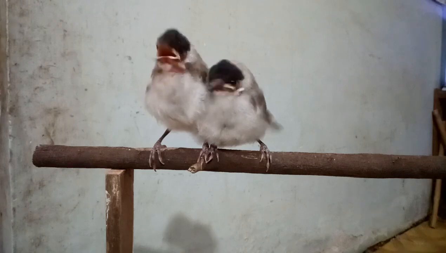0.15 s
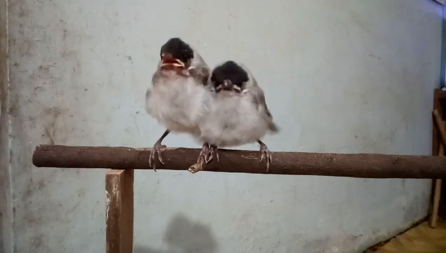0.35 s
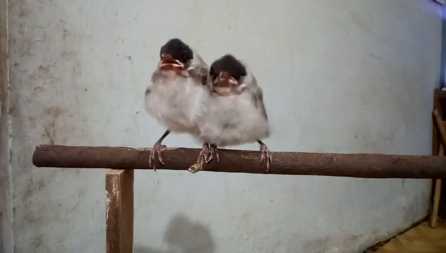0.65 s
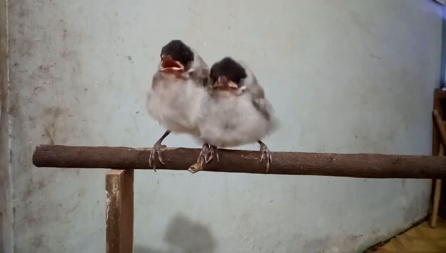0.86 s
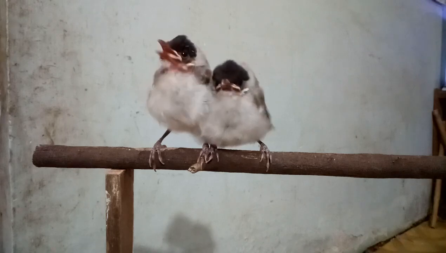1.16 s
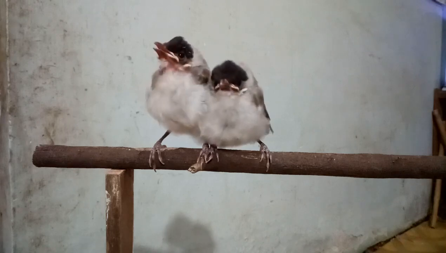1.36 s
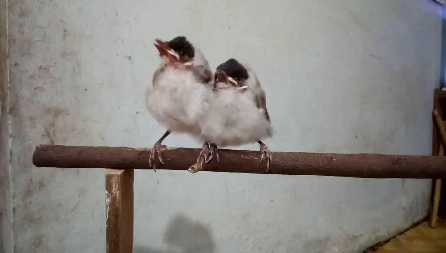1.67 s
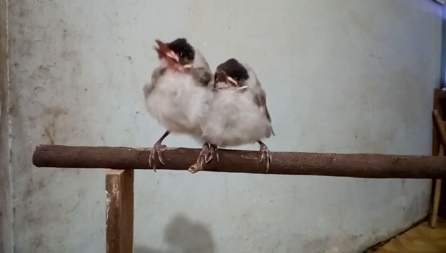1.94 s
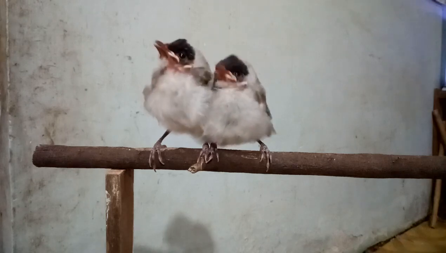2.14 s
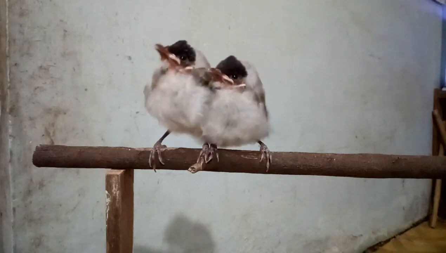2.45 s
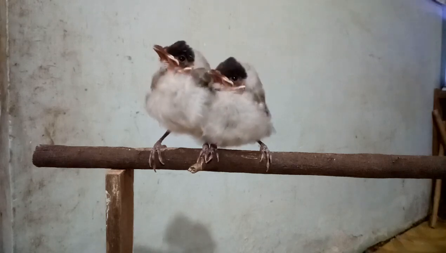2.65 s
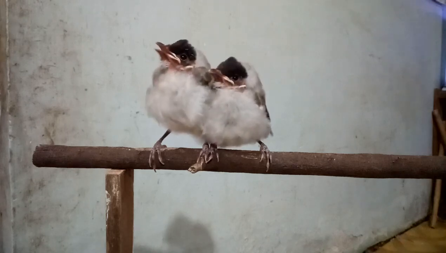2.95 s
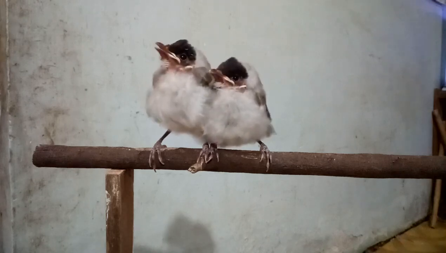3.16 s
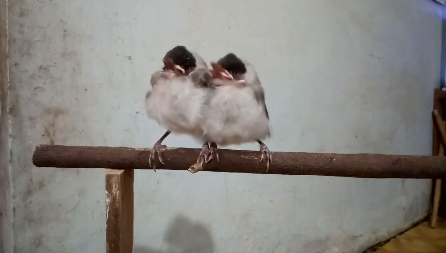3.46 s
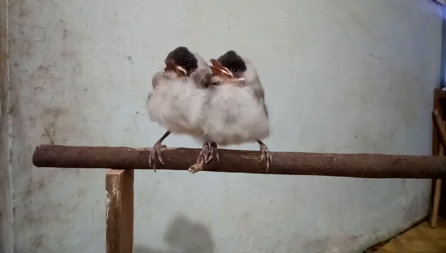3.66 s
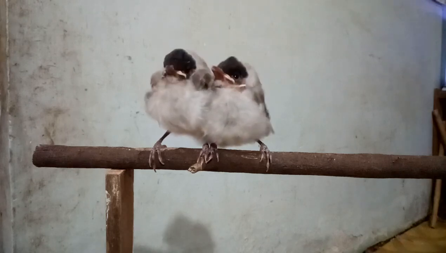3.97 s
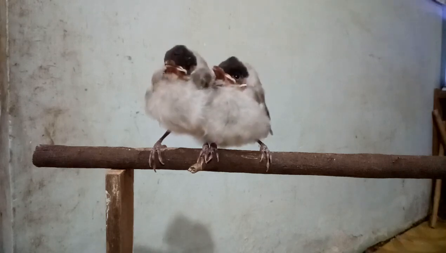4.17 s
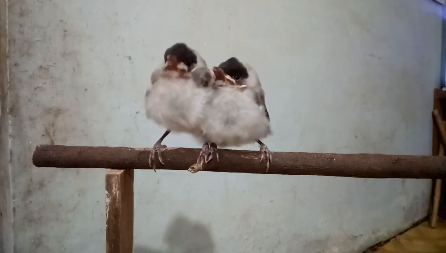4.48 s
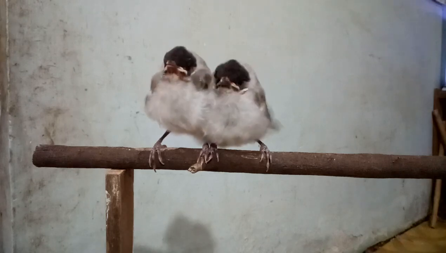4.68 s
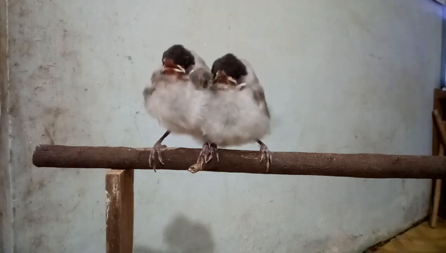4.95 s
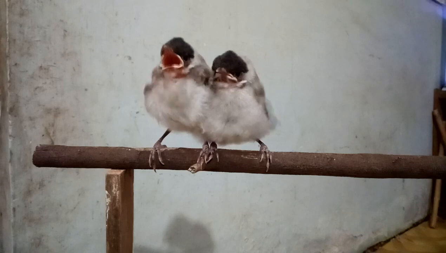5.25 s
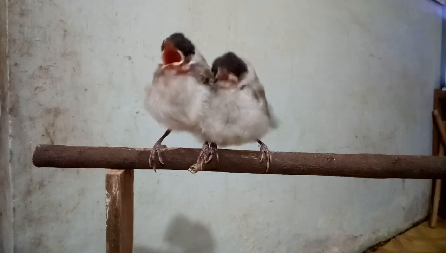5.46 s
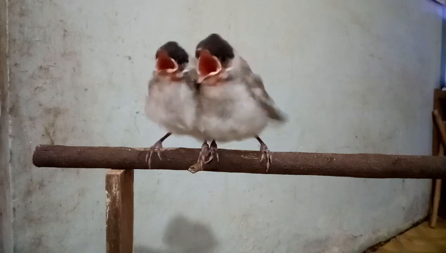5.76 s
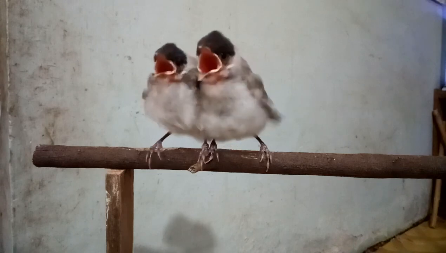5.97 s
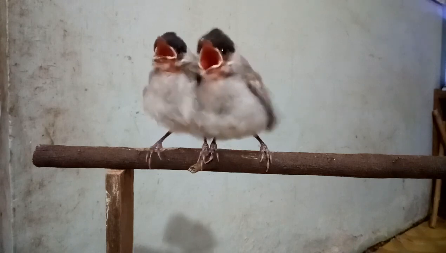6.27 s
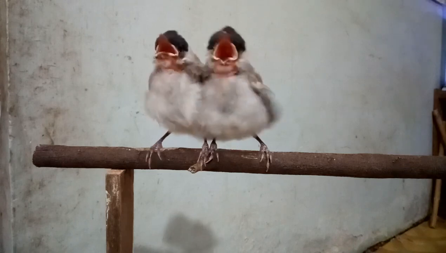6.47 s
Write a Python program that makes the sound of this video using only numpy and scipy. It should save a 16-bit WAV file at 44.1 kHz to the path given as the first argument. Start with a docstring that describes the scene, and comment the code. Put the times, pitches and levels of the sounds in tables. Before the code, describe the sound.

Fledglings chirp rapidly close by indoors, their high calls often trilling, with a soft low hum behind them.

```python
"""A small, hard-walled room: two fledglings beg close by on a wooden perch.
Each chirp is a shrill syrinx whistle that opens with a rasp or a downward scoop and often breaks
into a fast trill. The walls ring after every call. The perch knocks once.
Behind them an electric motor hums and buzzes faintly over a soft rush of air."""
import sys
import numpy as np
from scipy import signal
from scipy.fft import rfft, irfft
from scipy.io import wavfile

SR = 44100
rng = np.random.default_rng(int(sys.argv[2]) if len(sys.argv) > 2 else 0)


def wav_record(signal):
    """Record a signal, one row per channel, as 16-bit PCM in the file named by sys.argv[1]."""
    frames = np.transpose(np.atleast_2d(signal))
    bounded = np.clip(frames, -1, 1)
    # unit amplitude maps onto the largest positive 16-bit level
    quanta = np.round(bounded * 32767).astype(np.int16)
    wavfile.write(sys.argv[1], SR, quanta)


N = 291942
TIME = np.arange(N) / SR
ATTACK_S, RELEASE_S = .007, 0.0098  # half the length of each call's fade in and fade out

# Trilled calls. Each row: start and length in seconds, nominal pitch in Hz, glide as a share of pitch,
# trill rate in Hz, nominal swing in Hz, trill build time and opening rasp in seconds,
# relative levels of call, octave and in-between tones in dB.
TRILL_CALLS = [(0.088, .072, 2894, 0.056, 77.8, 420, .065, 0.025, -28, -8, -13),
               (0.896, .096, 3636, .16, 94.1, 425.4, 0.063, 0.024, -23.5, -9, -19),
               (1.085, .084, 3168, .04, 101, 324, .06, .02, -22, -9.5, -20.5),
               (1.31, 0.072, 2916, -.04, 69.7, 234, 0.053, .014, -27, -9.5, -16),
               (2.507, 0.059, 3427, 0.065, 98, 470, .025, 0.0033, -23, -11.5, -30),
               (2.718, .049, 3027, 0.021, 91.9, 336.5, .035, 0.0025, -21, -15.5, -24),
               (3.283, 0.061, 3168, .06, 100.2, 333, 0.052, .013, -23, -15.5, -22),
               (3.819, 0.06, 3506, -.06, 105.3, 328.5, 0.0069, 0.0027, -23, -10, -26),
               (3.996, 0.053, 3195, -.01, 98.9, 332, .005, .004, -22.5, -14, -56),
               (5.225, .076, 3577, 0.094, 106.5, 343, 0.0039, .011, -22, -7.5, -18.5),
               (5.403, 0.099, 3226, -0.047, 99.1, 316, .005, 0.0033, -26, -8, -14),
               (5.609, .08, 3134, -.06, 75.1, 387, 0.06, .016, -27, -2, -10),
               (5.795, .08, 3238, -.05, 110.2, 311.4, 0.0041, 0.028, -27.5, -3.5, -12.5),
               (6.161, 0.041, 4307, -0.079, 81, 260, .04, 0.0072, -26.5, -28, -21.5),
               (6.284, 0.045, 4234, 0.072, 90.55, 375, 0.0028, .009, -28.5, -22, -16),
               (6.349, .055, 3764, 0.16, 91.4, 327, 0.055, 0.018, -23.5, -20.5, -26.5),
               (6.435, 0.054, 3252, -0.0096, 98.2, 353, 0.0042, 0.011, -26.5, -4.5, -10.5),
               (6.471, 0.061, 3763, .12, 93.5, 482, 0.0058, 0.015, -27.5, -26, -13.5)]
# Clear calls. Each row: start and length in seconds, nominal pitch in Hz, glide as a share of pitch,
# opening rasp in seconds, relative levels of call and octave in dB.
WHISTLE_CALLS = [(0.806, 0.049, 3690, .02, .003, -22, -12.5), (1.873, 0.064, 3330, .22, 0.024, -22, -24),
                 (2.338, 0.052, 3862, .06, 0.0027, -22, -17.5),
                 (3.089, 0.068, 3394, .05, 0.022, -25.5, -14.5),
                 (3.656, .051, 3773, -.1, 0.0042, -21.5, -18), (4.254, 0.075, 3320, .115, 0.02, -24, -24),
                 (5.055, 0.048, 3750, .02, 0.0036, -22.5, -13.5)]
# Swooping calls. Each row: start and length in seconds, opening, low and upper pitch in Hz,
# glide as a share of pitch, nominal closing swing in Hz, relative levels of call, low note, octave in dB.
SWOOP_CALLS = [(.274, .082, 4240, 2555, 2908, -.06, 34, -29, -1, -4.5),
               (2.001, 0.068, 3800, 2710, 3398, 0.02, 600, -25, -6, -18),
               (2.186, .087, 3990, 2568, 2930, -0.11, 92, -25.5, -1.5, -9.5),
               (2.444, 0.073, 4160, 2510, 2805, -.06, 20, -23.5, -4, -21.5),
               (3.476, .072, 4114, 2566, 2941, -0.1, 23, -24, -3.5, -14.5),
               (4.451, .076, 3574, 2743, 3012, -0.017, 240, -23, -5.5, -15.5),
               (4.645, 0.068, 3860, 2512, 3002, 0.072, 427, -22, -8, -20)]
# Filter of throat and open beak. Each row: frequency in Hz, gain in dB.
BEAK_GAIN = [(1100, -15.5), (1500, -4.5), (2300, -2.5), (2700, -2.5), (3400, 2), (4150, 6), (5050, -6),
             (5700, 5), (7000, -0.5), (8300, -15), (10000, 3), (12500, -14.5), (15500, -25)]
# Turbulence in the open throat. Each row: frequency in Hz, relative level in dB.
THROAT_HISS = [(1200, -22), (2200, -9.5), (2750, -5.5), (4300, 7.5), (5000, -3.5), (5800, -17),
               (7200, -15.5), (8500, -21), (14000, -53)]
# Sound thrown sideways by the beak and returned by the walls. Each row: frequency in Hz, gain in dB.
WALL_GAIN = [(1500, 1), (2600, 1.5), (3200, -2), (3800, 4.5), (4400, 1), (5100, -1), (6000, -2.5),
             (9000, 0.5), (14000, -4.5)]
# Room decay. Each row: frequency in Hz, time to fall 60 dB in seconds.
ROOM_T60 = [(1500, 0.23), (3000, 0.26), (5000, 0.27), (8000, 0.22), (14000, 0.21)]
# Motor hum. Each row: frequency in Hz, level in dB.
MOTOR_TONES = [(99.95, -38), (199.9, -50.5), (240.2, -65), (441, -69.5)]
# Lulls as the motor's loose part settles. Each row: centre and half width in seconds, depth in dB.
BUZZ_LULLS = [(2.778, 0.58, -19), (6.6, 0.4, -26)]
# Room air. Each row: frequency in Hz, relative spectral density in dB.
AIR_SPECTRUM = [(25, -9.5), (60, -7.5), (110, 6), (180, 3), (300, -8), (480, -12), (700, -25), (1100, -36),
                (2500, -41), (6000, -52.5), (15000, -54.5)]


def fledglings(gain_db=-1.0):
    """All calls of both birds, filtered by throat and beak."""
    jitter, shimmer, waver = wander(hz=1000), wander(hz=268), wander(hz=125)
    noises = np.array([jitter, shimmer, waver, unit(shaped_noise(THROAT_HISS))])
    return undb(gain_db) * colour(whistles(noises) + swoops(noises) + trills(noises), BEAK_GAIN)


def syrinx(start_s, length_s, pitch_hz, swing_hz, trill_hz, rasp_s, db, octave_db, between_db, noises,
           sag=0.088, bloom_s=0.0068, last_crest_s=.008, wide_swing_hz=500, alternation=.25, cusp=0.22,
           rasp_tone_db=-4, rasp_hiss_db=-3, trill_hiss_db=-19, opening_db=-8, crest_db=2.0):
    """One call as (onset, samples): membranes flap irregularly, then lock into a trilling tone."""
    t = call_clock(length_s)
    jitter, shimmer, waver, hiss = noises.take(int(start_s * SR) + np.arange(len(t)), axis=1, mode="wrap")
    opening = np.clip((t + ATTACK_S) / (2 * ATTACK_S), 0, 1)
    closing = np.clip((t - length_s + RELEASE_S) / (2 * RELEASE_S), 0, 1)
    pitch_hz = pitch_hz * (1 - sag * closing ** 2) * (1 + .01 * waver)  # sags as pressure is let go
    # uneven turns with pointed crests, alternately wide and narrow
    swing_hz = swing_hz * np.exp(.15 * waver)
    turn = 2 * np.pi * trill_hz * (t - length_s + last_crest_s) + .35 * waver
    offset_hz = swing_hz * (1 + alternation * np.cos(turn / 2)) * (np.cos(turn) + cusp * np.cos(2 * turn))
    hz = pitch_hz + offset_hz
    # unsteady before the lock, and slightly so in a wide trill
    rasp_depth = min(rasp_s / bloom_s, 1)
    rasp = rasp_depth * np.exp(-(t / rasp_s) ** 4)
    strain = swing_hz / wide_swing_hz
    unrest = .005 + .015 * strain + 0.12 * rasp
    phase = 2 * np.pi * np.cumsum(hz * (1 + unrest * jitter)) / SR
    # Each pair: multiple of the pitch, level in dB. Unequal alternate cycles give the half multiples.
    partials = [(2, octave_db), (.5, -24 + between_db / 5)]
    partials += [(3 + k, -13 + 1.35 * octave_db - 0.5 * k) for k in range(3)]
    partials += [(1.5 + k, between_db - 10 * np.sqrt(2 * k)) for k in range(4)]
    bloom = np.clip((t + ATTACK_S) / (bloom_s + rasp_s), 0, 1) * (1 - closing)  # partials need pressure
    tone = np.sin(phase)
    for k, partial_db in partials:
        tone += undb(partial_db) * bloom ** abs(k - 1) * np.sin(k * phase) * (k * hz < SR / 2)
    # unsteady vibration turns part of the air to hiss
    breath = hiss * np.sqrt(bloom) * (undb(rasp_hiss_db) * rasp + undb(trill_hiss_db) * strain)
    voice = np.sqrt(2) * tone * undb(rasp_tone_db * rasp) + breath
    # soft until locked, fullest past the middle, loudest on the crests
    unlocked = rasp_depth * np.exp(-(np.maximum(t, 0) / (1.085 * rasp_s)) ** 4)
    arch_db = -5 * (t / length_s - 0.55) ** 2
    level_db = db + opening_db * unlocked + arch_db + crest_db * offset_hz / wide_swing_hz
    gate = (np.sin(np.pi / 2 * opening) * np.cos(np.pi / 2 * closing)) ** 2
    return start_s - ATTACK_S, voice * gate * undb(level_db) * np.exp(.18 * shimmer)


def trills(noises, drop=0.068, lead_db=-20):
    """Harsh calls whose pitch shakes wider and wider up to full swing."""
    out = np.zeros(N)
    for (start_s, length_s, hz, share, trill_hz, full_swing_hz, build_s, rasp_s,
         db, octave_db, between_db) in TRILL_CALLS:
        t = call_clock(length_s)
        pitch_hz = hz * glide(t, length_s, share) * scoop(t, drop)
        swing_hz = full_swing_hz * np.clip(t / build_s, 0, 1) ** 2
        add(out, *syrinx(start_s, length_s, pitch_hz, swing_hz, trill_hz, rasp_s,
                         db, octave_db, between_db, noises))
        add(out, *lead_in(start_s, hz, db + lead_db))
    return out


def whistles(noises, drop=0.14, waver_hz=49, end_swing_hz=70, lead_db=-22):
    """Clear calls with a small scoop and a waver that grows towards the end."""
    out = np.zeros(N)
    for start_s, length_s, hz, share, rasp_s, db, octave_db in WHISTLE_CALLS:
        t = call_clock(length_s)
        pitch_hz = hz * glide(t, length_s, share) * scoop(t, drop)
        swing_hz = end_swing_hz * np.clip(t / length_s, 0, 1)
        between_db = -15 + 0.71 * octave_db
        add(out, *syrinx(start_s, length_s, pitch_hz, swing_hz, waver_hz, rasp_s,
                         db, octave_db, between_db, noises))
        add(out, *lead_in(start_s, hz, db + lead_db, ahead_s=.014))
    return out


def swoops(noises, dive_s=.0085, step_s=.029, step_width_s=.004, trill_hz=77, rasp_s=0.0035,
           hoarse_db=4, lead_db=-8):
    """Calls that dive to a soft, hoarse low note, step up and may end in a trill."""
    out = np.zeros(N)
    for start_s, length_s, from_hz, low_hz, hz, share, end_swing_hz, db, low_db, octave_db in SWOOP_CALLS:
        t = call_clock(length_s)
        low = (1 - np.tanh((t - step_s) / step_width_s)) / 2
        after_step = np.clip((t - step_s) / (length_s - step_s), 0, 1)
        dive_hz = low_hz * scoop(t, from_hz / low_hz - 1, dive_s)
        pitch_hz = low * dive_hz + (1 - low) * hz * (1 + share * after_step)
        swing_hz = end_swing_hz * after_step ** 0.64
        between_db = -10 + 0.85 * octave_db + hoarse_db * low
        add(out, *syrinx(start_s, length_s, pitch_hz, swing_hz, trill_hz, rasp_s,
                         db + low_db * low, octave_db, between_db, noises))
        add(out, *lead_in(start_s, hz, db + low_db + lead_db))
    return out


def lead_in(start_s, pitch_hz, db, ahead_s=0.01, length_s=.016, from_ratio=1.56, to_ratio=1.3):
    """A thin, scratchy whistle slides down towards the note as the syrinx opens."""
    along = np.linspace(0, 1, int(length_s * SR))
    scratch = 0.19 * rng.standard_normal(SR // 10)[:len(along)]
    hz = pitch_hz * (from_ratio + (to_ratio - from_ratio) * along) * (1 + scratch)
    envelope = undb(db) * np.sin(np.pi * along ** 0.91) ** 2
    return start_s - ahead_s, envelope * np.sqrt(2) * np.sin(2 * np.pi * np.cumsum(hz) / SR)


def call_clock(length_s):
    """Seconds from the start of a call, padded for attack and release."""
    return np.arange(-ATTACK_S, length_s + RELEASE_S, 1 / SR)


def glide(t, length_s, share):
    """Pitch factor: a linear slide through the body of a call."""
    return 1 + share * (np.clip(t / length_s, .2, .9) - .55) / .7


def scoop(t, share, scoop_s=.0088):
    """Pitch factor: a drop into the note from a share above it."""
    return 1 + share * np.exp(-(np.maximum(t, 0) / scoop_s) ** 2)


def perch(start_s=5.768, contact_s=0.00067):
    """Two wood modes knock softly as a bird stands up."""
    out, t = np.zeros(N), np.arange(SR // 4) / SR
    ring = sum(undb(db) * decay(t, t60_s) * np.sin(2 * np.pi * hz * t)
               for hz, db, t60_s in [(565, -46, .13), (1450, -51, .06)])
    add(out, start_s, ring * (1 - np.exp(-t / contact_s)))
    return out


def room(x, early_db=-12, early_s=0.0077, tail_db=-10, build_s=0.006):
    """Direct sound, quick reflections off near walls, then a diffuse ring whose top fades first."""
    t = np.arange(SR) / SR
    hz, frame_s, cells = signal.stft(shaped_noise(WALL_GAIN, SR), SR)
    cells = cells * decay(frame_s, on_log_axis(hz, ROOM_T60)[:, None])
    tail = signal.istft(cells, SR)[1][:SR] * (1 - np.exp(-t / build_s))
    early = np.zeros(SR)
    early[rng.integers(SR // 500, SR // 30, size=24)] = 1
    early *= np.exp(-t / early_s)
    response = undb(early_db) * early / np.linalg.norm(early) + undb(tail_db) * tail / np.linalg.norm(tail)
    return x + signal.fftconvolve(x, response)[:N]


def opening_ring(db=-53, t60_s=0.62):
    """The walls still ring from a raspy call just before the start."""
    return undb(db) * unit(colour(shaped_noise(THROAT_HISS), WALL_GAIN)) * decay(TIME, t60_s)


def motor_hum(shaft_hz=20.2, throb=0.14, waver_db=0.73):
    """Magnetic hum that throbs with each turn of the shaft."""
    hum = sum(undb(db) * np.sqrt(2) * np.sin(2 * np.pi * (hz * TIME + rng.random()))
              for hz, db in MOTOR_TONES)
    return hum * (1 + throb * np.sin(2 * np.pi * shaft_hz * TIME)) * undb(waver_db * wander(hz=2.3))


def motor_buzz(db=-70.5, mains_hz=50, ring_hz=660, width_hz=260):
    """A loose part ticks once per mains cycle and settles twice."""
    ticks = np.diff(np.floor(mains_hz * TIME), prepend=0)
    b, a = signal.iirpeak(ring_hz, ring_hz / width_hz, fs=SR)
    buzz = signal.lfilter(b, a, signal.lfilter(b, a, ticks))
    lull_db = sum(depth_db * np.exp(-((TIME - at_s) / half_s) ** 2) for at_s, half_s, depth_db in BUZZ_LULLS)
    return undb(db + lull_db) * unit(buzz)


def room_air(db=-52.5):
    """Soft, low, steady rush of air."""
    return undb(db) * unit(shaped_noise(AIR_SPECTRUM))


def undb(db):
    """Decibels to gain."""
    return 10 ** (np.asarray(db) / 20)


def unit(x):
    """Scale to an rms of 1."""
    return x / np.sqrt(np.mean(x ** 2))


def decay(t, t60_s):
    """Fall by 60 dB every t60_s."""
    return np.exp(-np.log(1000) * t / t60_s)


def on_log_axis(hz, points):
    """Interpolate (Hz, value) points over log frequency."""
    point_hz, value = np.transpose(points)
    return np.interp(np.log(np.maximum(hz, 1)), np.log(point_hz), value)


def colour(x, points):
    """Filter with a (Hz, dB) spectrum."""
    return irfft(rfft(x) * undb(on_log_axis(np.fft.rfftfreq(len(x), 1 / SR), points)), len(x))


def shaped_noise(points, samples=N):
    """Noise with a (Hz, dB) spectrum."""
    return colour(rng.standard_normal(samples), points)


def wander(hz):
    """Smooth random motion up to about hz, rms 1."""
    lowpass = np.exp(-(np.fft.rfftfreq(N, 1 / SR) / hz) ** 2)
    return unit(irfft(rfft(rng.standard_normal(N)) * lowpass, N))


def add(out, start_s, x):
    """Mix x into out at start_s."""
    i = int(start_s * SR)
    out[i:i + len(x)] += x[:len(out) - i]


def scene():
    """Birds and perch in the room, over motor and air; mono."""
    air = room_air()
    return (room(fledglings() + perch()) + opening_ring() + motor_hum() + motor_buzz() + air)[None]


def record(dry, top_hz=15650):
    """Steep low-pass on the top treble."""
    return signal.sosfilt(signal.ellip(8, .2, 70, top_hz, fs=SR, output="sos"), dry)


dry = scene()
out = record(dry)
wav_record(out)
```